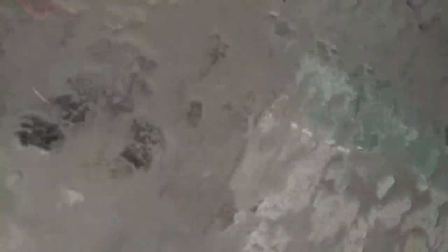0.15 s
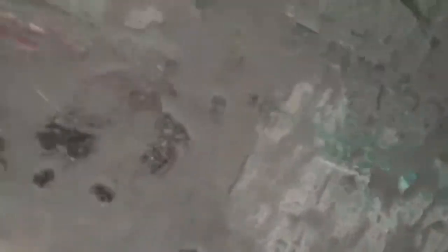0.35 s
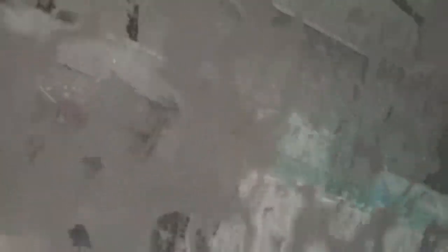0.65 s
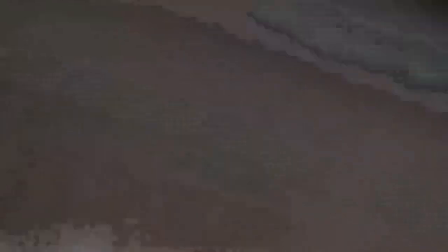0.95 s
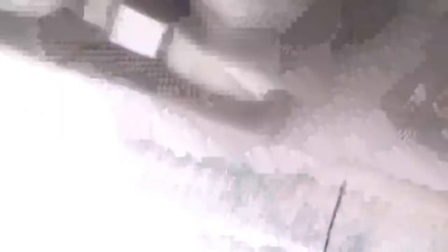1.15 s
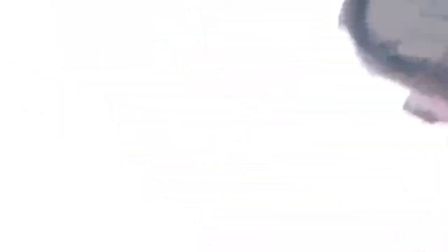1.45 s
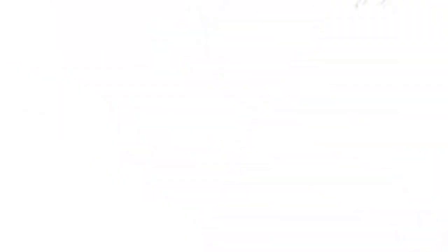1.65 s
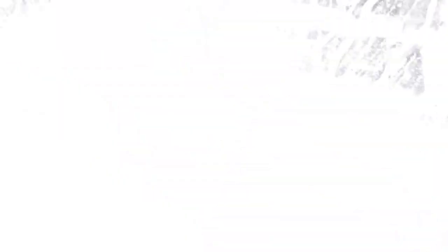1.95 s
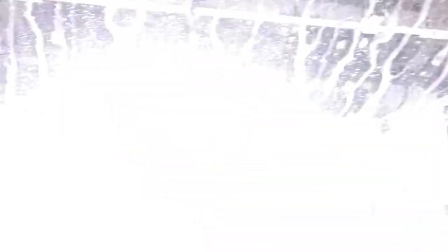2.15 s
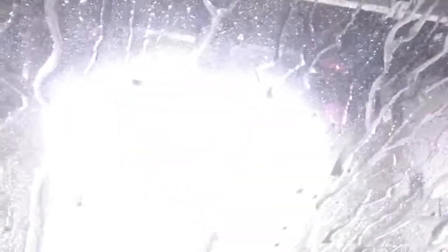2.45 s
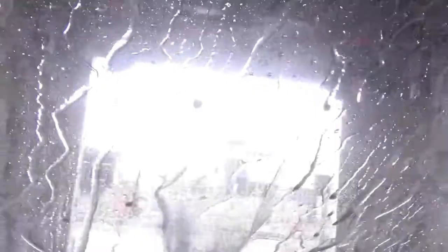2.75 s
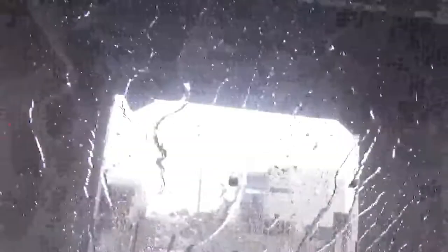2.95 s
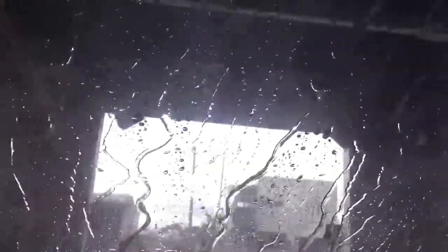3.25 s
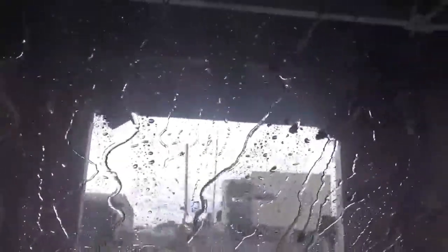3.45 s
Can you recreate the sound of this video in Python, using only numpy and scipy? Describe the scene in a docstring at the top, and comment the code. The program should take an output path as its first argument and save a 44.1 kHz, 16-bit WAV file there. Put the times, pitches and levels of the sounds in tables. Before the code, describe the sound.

Inside a closed car in a wash bay, a water jet hammers the roof close overhead, moves over the glass and dies away; a few drips tick over faint engine throb and machinery hum.

```python
"""Inside a car wash

Stereo at the front seat of an idling car, cabin closed: a jet drums on the roof close overhead, moves on
over the glass and dies away. A heavy drop knocks on the roof, then drips tick and splashes spatter on the
windscreen, with one lighter knock among them. The engine throbs below; machinery hums through the cabin.
Water is random impacts, coloured and rung by resonances; drops are sharp pushes with a brief noise ring.
The engine and the hum are sines, the rush of the bay is coloured noise."""
import sys
import numpy as np
from scipy.fft import rfft, irfft, next_fast_len
from scipy.io import wavfile
from scipy.ndimage import map_coordinates

SR = 44100
rng = np.random.default_rng(int(sys.argv[2]) if len(sys.argv) > 2 else 0)


def output_pcm(signal):
    """Save a mono or channel-first signal as 16-bit PCM at the path in sys.argv[1].

    Samples are clipped to [-1, 1] before scaling.
    """
    pcm = np.clip(np.atleast_2d(signal).T, -1, 1) * 32767
    wavfile.write(sys.argv[1], SR, np.round(pcm).astype(np.int16))


N = 158760
T = np.arange(N) / SR  # seconds
TOP_HZ = 11150  # band limit

# In every colour table the levels are relative; a spread is the standard deviation of a bell-shaped swell.

# Left-right likeness in the cabin. Each row: frequency in Hz, correlation of the two channels.
LIKENESS = [(100, 1), (300, 0.95), (600, 0.66), (2000, 0.58), (5000, 0.56), (9000, 0.8)]

# Throb of the idling engine. Each entry: level in dB of the next multiple of the firing rate.
ENGINE_DB = [-40.5, -59, -60]
FIRING_HZ = 23.16

# Hum of the wash machinery. Each row: frequency in Hz, mean level in dB.
HUM = [(122, -50), (140, -46), (173, -51)]
HUM_WAVER_DB, HUM_DRIFT_HZ = 0.5, 2.94
BOOM_S, BOOM_SPREAD_S, BOOM_HZ, BOOM_DB = 2.83, 0.033, 174.7, -37  # the hum swells once

# Colour of the wash bay through the cabin. Each row: frequency in Hz, level in dB per Hz.
BAY_COLOUR = [(25, -5.5), (60, -6), (90, -10.5), (120, -0.5), (175, -2.5), (215, -10.5), (320, -12),
              (450, -17), (600, -21), (740, -13.5), (1000, -17.5), (1700, -25.5), (3200, -23.5),
              (5000, -30.5), (7500, -35.5), (11000, -37)]
BAY_DB = -39.5

# Spray on the car, before the trims below. Each row: time in seconds, roof drumming in dB,
# glass patter in dB, mist hiss in dB, left over right in dB.
SPRAY = [(0, -34, -29, -35, 1.5), (.23, -32.5, -34, -36.5, 5), (.44, -42.5, -29.5, -40.5, 4),
         (.54, -34.5, -34.5, -42.5, 3.5), (.77, -35.5, -35.5, -44, 4.5), (1.029, -33.5, -34, -41.5, 3.5),
         (1.138, -35.5, -34.5, -43.5, 4.5), (1.5, -35.5, -33.5, -43, 4), (1.7, -34.5, -34.5, -44, 4.5),
         (1.88, -36.5, -37.5, -45.5, 2.5), (2.03, -39.5, -37.5, -48.5, 1.5), (2.21, -42, -40, -54.5, 1.5),
         (2.43, -41.5, -48.5, -73, 2), (2.9, -43, -50.5, -65, 11)]
ROOF_TRIM_DB, GLASS_TRIM_DB, MIST_TRIM_DB = 2.5, 1, 2
ROOF_RATE, GLASS_RATE, MIST_RATE = 5000, 5000, 9000  # droplets a second at full flow
DRAIN_START_S, DRAIN_DB_PER_S = 2.096, 16.5  # the jet has passed; the last of it thins out

# Colours of roof drumming, glass patter and mist. Each row: frequency in Hz, level in dB per Hz.
ROOF_COLOUR = [(80, -19.5), (115, 1.5), (160, -0.5), (220, 3.5), (370, 3.5), (520, 2.5), (780, 1.5),
               (1100, -0.5), (1500, -4.5), (2200, -18), (4000, -47.5)]
GLASS_COLOUR = [(600, -15.5), (1300, -4), (2000, 0.5), (2400, 0), (2750, -2), (3300, -1.5), (3900, -3.5),
                (4800, -7.5), (5800, -17.5), (8000, -43)]
MIST_COLOUR = [(3000, -5.5), (5000, 2), (6300, 2), (7500, 0), (9000, 1), (11000, -6.5)]

# Panel resonances rung by spray and jet. Each row: centre in Hz, width in Hz, dB against the bare impact.
PANEL = [(743, 22, -2.5), (817, 11, -7), (1012, 31, -10), (1400, 8.7, -18.5), (1640, 6.6, 0),
         (1875, 9.8, -3), (2020, 84, -7), (2795, 38, -1), (3500, 28, -19), (3770, 47, -29)]

# The jet square on the roof. Each row: time in seconds, level in dB.
JET_LEVEL = [(0, -23), (.08, -21), (.17, -19.8), (.3, -21.5), (.41, -23.5), (.47, -27), (.54, -34.5),
             (.62, -69)]
JET_RATE, JET_PAN_DB = 14000, 3.5  # droplets a second; left over right
JET_WAVER_DB = 1  # each resonance comes and goes as the jet moves

# Colour of the jet on the roof. Each row: frequency in Hz, level in dB.
JET_COLOUR = [(100, -31), (160, -12.5), (215, 0), (400, -2.5), (750, 0.5), (1300, -2), (2000, -4.5),
              (2800, -7), (4000, -10), (5200, -18), (7000, -50), (11000, -28)]

# Metal under the jet. Each row: centre in Hz, width in Hz, mean dB against the bare impact.
JET_RINGS = [(1170, 62, -4), (1447, 31, 0.5), (1570, 43, -15), (2040, 64, -4.5), (2670, 130, -4),
             (3830, 190, -3)]

# Roof booms as the jet comes square onto it. Each row: middle in seconds, spread in seconds,
# level in dB, centre in Hz, width in Hz.
JET_BOOMS = [(0.092, 0.024, -33, 402.3, 200), (0.163, 0.056, -31, 802, 500), (0.265, 0.061, -32, 946, 400),
             (0.274, 0.052, -30, 1750, 450), (.37, 0.062, -32, 1406, 300)]

# Glass ringing under the travelling spray. Each row: time in seconds, pitch in Hz, level in dB.
SWEEP = [(0, 2686, -48), (.4, 2700, -38), (.52, 2677, -38), (.66, 2760, -47), (.8, 2750, -46),
         (0.889, 2744, -41), (.96, 2856, -39.5), (1.02, 3110, -39), (1.11, 2945, -52), (1.25, 2450, -40.5),
         (1.42, 2290, -53), (1.7, 2250, -54), (2.15, 3007, -45), (2.3, 3100, -50), (2.45, 3200, -64),
         (2.6, 3220, -85)]
SWEEP_WIDTH_HZ, SWEEP_PAN_DB = 530, 4.5

# Gouts of water thudding on the roof. Each row: middle in seconds, spread in seconds, level in dB, centre in Hz.
GOUTS = [(0.551, 0.0078, -31, 234), (0.77, 0.017, -39, 226), (1.2, 0.013, -32.5, 550),
         (1.245, 0.062, -37, 383), (1.355, 0.033, -37, 367), (1.525, 0.032, -40, 372),
         (1.697, 0.015, -34, 287), (1.875, 0.017, -33.5, 342), (1.86, 0.018, -36, 743)]
GOUT_WIDTH = 0.36  # fraction of the centre frequency

# Push of a drop and its early reflections in the cabin. Each row: delay in seconds, level in dB.
ECHOES = [(0, 1), (.0003, -5), (.0016, -7), (.0038, -9)]

# Heavy drops on the roof. Each row: time in seconds, level in dB (the slap is trimmed below),
# treble tilt of the slap in dB per octave.
KNOCKS = [(.9703, -9.3, 0), (2.6555, -23.5, 2.5)]
KNOCK_T60_S, KNOCK_TRIM_DB, KNOCK_SNAP = .022, -2.5, 5  # snap: push height against the ring's start
KNOCK_PIVOT_HZ, KNOCK_PAN_DB = 1500, 4

# Colour of that slap. Each row: frequency in Hz, level in dB.
KNOCK_COLOUR = [(150, -20), (450, -7), (800, 0), (1300, -2), (1900, -11), (2400, -8), (3200, -13),
                (3800, -25), (5200, -26), (6500, -34), (11000, -41)]

# Low modes of the roof. Each row: frequency in Hz, level in dB below the drop, fall by 60 dB in seconds.
ROOF_MODES = [(650, -14, .018), (845, -10, .024)]

# Drips on the glass, before the trim below. Each row: time in seconds, level in dB,
# treble tilt in dB per octave.
DRIPS = [(1.362, -22.5, 1), (1.5275, -17.5, .5), (2.4448, -27, 0), (2.4835, -36.5, 0), (2.5466, -21.5, .5),
         (2.7018, -39, -1), (2.7302, -23, -2.5), (2.770, -24.5, -2.5), (2.8168, -33.5, -1),
         (3.490, -13.5, -2)]
DRIP_T60_S, DRIP_TRIM_DB, DRIP_SNAP, DRIP_PIVOT_HZ = .014, -6.3, 5.5, 4500

# Colour of a drip. Each row: frequency in Hz, level in dB.
DRIP_COLOUR = [(300, -25), (1500, -17), (2600, -9), (3150, -10), (3650, 0), (4400, -3), (5600, -6),
               (6700, -12), (9000, -15), (11000, -12)]

# Splashes on the glass. Each row: middle in seconds, spread in seconds, body in dB, fizz in dB,
# ring in dB, ring pitch in Hz.
SPLASHES = [(2.669, .002, -36.5, -46, -41, 4300), (2.675, .003, -41, -47, -47, 3300),
            (3.033, .016, -47.5, -47.5, -46.5, 3900), (3.143, .018, -46.5, -51, -48, 3600),
            (3.202, .005, -43.5, -45.5, -45, 3450), (3.227, .012, -40, -43, -43, 3500),
            (3.379, .0039, -40, -33, -42, 2600), (3.484, .008, -47, -46, -50, 2600)]
SPLASH_RATE, SPLASH_RING_WIDTH_HZ = 2700, 850  # droplets a second
SPLASH_GRIT_DB = 1.5  # the droplets arrive in clumps

# Colours of splash body and fizz. Each row: frequency in Hz, level in dB.
BODY_COLOUR = [(400, -11), (1000, -8.5), (1600, 5), (2500, -5), (3600, 2), (5500, 3), (8000, -23)]
FIZZ_COLOUR = [(3000, -10), (5000, -10), (7000, 1), (9000, -1.5), (10800, -2.5)]

# Windscreen resonances. Each row: centre in Hz, width in Hz, dB against the bare impact.
WINDSCREEN = [(2650, 200, -4), (3330, 120, -5), (3650, 170, -17), (5030, 430, -8)]


def amp(db):
    """Decibels to gain."""
    return 10 ** (np.asarray(db) / 20)


def unit(x):
    """Scaled to rms 1."""
    return x / np.sqrt(np.mean(x ** 2) + 1e-20)


def along(points, hz):
    """(Hz, value) points read on a log frequency axis."""
    f, v = np.transpose(points)
    return np.interp(np.log(hz + 1), np.log(f + 1), v)


def wobble(rate):
    """A smooth random curve, rate knots a second."""
    knots = rng.standard_normal(int(N * rate / SR) + 4)
    return map_coordinates(knots, [T * rate])


def swell(s, spread):
    """A smooth bell-shaped rise and fall around a moment."""
    return np.exp(-.5 * ((T - s) / spread) ** 2)


def decay(t, t60):
    """Exponential decay, down 60 dB after t60 seconds."""
    return np.exp(-np.log(1000) * t / t60)


def filtered(x, response):
    """x times a complex response of frequency."""
    m = 2 * next_fast_len(N)
    spectrum = rfft(x, m) * response(np.fft.rfftfreq(m, 1 / SR))
    return irfft(spectrum, m)[..., :N]


def coloured(x, colour):
    """x through a causal minimum-phase filter of unit energy with the given colour."""
    def response(hz):
        gain = amp(along(colour, hz)) * np.where(hz < TOP_HZ, 1, .5)
        cepstrum = irfft(np.log(unit(gain)))
        half = len(cepstrum) // 2
        # folding the cepstrum forward in time makes the filter causal
        return np.exp(rfft(np.r_[cepstrum[0], 2 * cepstrum[1:half], np.zeros(half)]))
    return filtered(x, response)


def stereo(pair):
    """Two unrelated signals blended into left and right, near mono in the bass."""
    def blend(hz):
        turn = np.arccos(np.clip(along(LIKENESS, hz), -1, 1)) / 2
        return np.array([np.cos(turn), np.sin(turn)])
    mid, side = filtered(pair, blend)
    return np.array([mid + side, mid - side])


def panned(db):
    """Left and right gains for a level difference."""
    return amp(np.array([[.5], [-.5]]) * db)


def droplets(rate, scatter_db):
    """Two streams of random impacts of uneven size and either sign."""
    hit = rng.random((2, N)) < rate / SR
    size = amp(scatter_db * np.clip(rng.standard_normal((2, N)), -2, 2))
    sign = np.sign(rng.standard_normal((2, N)))
    return unit(hit * size * sign / np.sqrt(rate))


def panel(x, modes):
    """Sheet metal and glass favour a few resonances, added to the bare impact."""
    def response(hz):
        return 1 + sum(amp(db) * 1j * hz * width / (centre ** 2 - hz ** 2 + 1j * hz * width)
                       for centre, width, db in modes)
    return filtered(x, response)


def ringing(centre_hz, width_hz):
    """Droplets exciting one resonance, whose pitch may move; stereo, rms 1."""
    def low(x):
        return filtered(x, lambda hz: 1 / (1 + 2j * hz / width_hz) ** 2)
    in_phase = low(droplets(GLASS_RATE, scatter_db=4.5))
    quadrature = low(droplets(GLASS_RATE, scatter_db=1.5))
    # slow noise carried up to the resonance
    turning = np.exp(2j * np.pi * np.cumsum(centre_hz * np.ones(N)) / SR)
    return unit(stereo(((in_phase + 1j * quadrature) * turning).real))


def engine():
    """The low, even throb of the idling engine: sines at multiples of a barely wavering firing rate."""
    phase = 2 * np.pi * np.cumsum(FIRING_HZ * (1 + .003 * wobble(2.9))) / SR
    return np.sqrt(2) * sum(amp(db) * np.sin(order * phase) for order, db in enumerate(ENGINE_DB, 1))


def machinery():
    """Sines wavering in level and pitch hum over the muffled noise of the bay."""
    hum = amp(BOOM_DB) * swell(BOOM_S, BOOM_SPREAD_S) * np.sin(2 * np.pi * BOOM_HZ * T)
    for hz, db in HUM:
        level = amp(db + HUM_WAVER_DB * wobble(6.6))
        phase = 2 * np.pi * np.cumsum(hz + HUM_DRIFT_HZ * wobble(9)) / SR
        hum = hum + level * np.sin(phase)
    bay = unit(stereo(coloured(rng.standard_normal((2, N)), BAY_COLOUR)))
    return np.sqrt(2) * hum + amp(BAY_DB) * bay


def spray():
    """Dense droplets on roof and glass under a fine mist; a weaker jet brings fewer of them."""
    s, *columns = np.transpose(SPRAY)
    roof_db, glass_db, mist_db, pan_db = [np.interp(T, s, column) for column in columns]
    drain_db = -DRAIN_DB_PER_S * np.maximum(T - DRAIN_START_S, 0)
    flow = amp(glass_db - glass_db.max())

    def layer(colour, rate, scatter_db, flutter_db):
        hits = panel(droplets(rate * np.sqrt(flow), scatter_db), PANEL)
        return unit(stereo(coloured(hits, colour))) * amp(drain_db + flutter_db * wobble(30.26))

    roof = amp(roof_db + ROOF_TRIM_DB) * layer(ROOF_COLOUR, ROOF_RATE, scatter_db=5, flutter_db=.4)
    glass = amp(glass_db + GLASS_TRIM_DB) * layer(GLASS_COLOUR, GLASS_RATE, scatter_db=1, flutter_db=.5)
    mist = amp(mist_db + MIST_TRIM_DB) * layer(MIST_COLOUR, MIST_RATE, scatter_db=1.5, flutter_db=.84)
    return (roof + glass) * panned(pan_db) + mist * panned(.3)


def jet():
    """The full jet hammers the roof, swells and booms as it comes square onto it, then swings away."""
    impact = panel(droplets(JET_RATE, scatter_db=1.5), PANEL)
    hits = impact
    for mode in JET_RINGS:
        ring_alone = panel(impact, [mode]) - impact
        hits = hits + ring_alone * amp(JET_WAVER_DB * wobble(11.7))
    level_db = np.interp(T, *np.transpose(JET_LEVEL)) + 0.57 * wobble(89.4)
    hammer = amp(level_db) * unit(stereo(coloured(hits, JET_COLOUR)))
    booms = sum(amp(db) * swell(s, spread) * ringing(hz, width) for s, spread, db, hz, width in JET_BOOMS)
    return (hammer + booms) * panned(JET_PAN_DB)


def sweep():
    """The travelling spray rings one patch of glass after another, so the resonance glides."""
    s, hz, db = np.transpose(SWEEP)
    ring = ringing(np.interp(T, s, hz), SWEEP_WIDTH_HZ)
    return amp(np.interp(T, s, db)) * ring * panned(SWEEP_PAN_DB)


def gouts():
    """Thicker clumps of water make the roof rumble briefly: swells of narrow-band noise."""
    out = np.zeros(N)
    for s, spread, db, centre in GOUTS:
        band = lambda hz: 1 / (1 + ((hz - centre) / (GOUT_WIDTH * centre / 2)) ** 2)
        rumble = unit(filtered(rng.standard_normal(N), band))
        out += amp(db) * swell(s, spread) * rumble
    return out * panned(1.3)


def impacts(rows, colour, t60, snap, pivot_hz):
    """Each drop is a sharp push, its early reflections and a brief diffuse ring, with its own treble tilt."""
    out = np.zeros((2, N + SR))
    t = np.arange(SR // 10) / SR
    lead = len(t) // 2  # room ahead of the push for the tilt filter
    octaves = np.clip(np.log2((np.fft.rfftfreq(len(t), 1 / SR) + 1) / pivot_hz), -2, 2)
    for s, db, tilt_db in rows:
        ring = rng.standard_normal((2, len(t))) * decay(t, t60)
        for delay, echo_db in ECHOES:
            ring[0, round(delay * SR)] += snap * amp(echo_db)
        tilted = irfft(rfft(np.roll(ring, lead, axis=1)) * amp(tilt_db * octaves), len(t))
        start = round(s * SR) - lead
        out[:, start:start + len(t)] += amp(db) * tilted
    return stereo(coloured(out[:, :N], colour))


def thuds():
    """A heavy drop also sets the roof's low modes swinging for a moment, as decaying sines."""
    out = np.zeros(N)
    for s, db, _ in KNOCKS:
        t = np.maximum(T - s, 0)
        for hz, level_db, t60 in ROOF_MODES:
            out += amp(db + level_db) * decay(t, t60) * np.sin(2 * np.pi * hz * t)
    return out


def knocks():
    """Dull knocks of heavy drops: a slap on the roof and the thud of its low modes."""
    slap = impacts(KNOCKS, KNOCK_COLOUR, KNOCK_T60_S, KNOCK_SNAP, KNOCK_PIVOT_HZ)
    return (amp(KNOCK_TRIM_DB) * slap + thuds()) * panned(KNOCK_PAN_DB)


def drips():
    """Bright ticks of single drips on the windscreen, each a push with a very short ring."""
    return amp(DRIP_TRIM_DB) * impacts(DRIPS, DRIP_COLOUR, DRIP_T60_S, DRIP_SNAP, DRIP_PIVOT_HZ)


def splashes():
    """Falling water breaks up into short, gritty showers; each rings its own spot of the glass."""
    body, fizz = np.zeros((2, N))
    rings = np.zeros((2, N))
    for s, spread, body_db, fizz_db, ring_db, ring_hz in SPLASHES:
        shape = swell(s, spread)
        body += amp(body_db) * shape
        fizz += amp(fizz_db) * shape
        rings += amp(ring_db) * shape * ringing(ring_hz, SPLASH_RING_WIDTH_HZ)

    def shower(colour):
        hits = panel(droplets(SPLASH_RATE, scatter_db=.5), WINDSCREEN)
        return unit(stereo(coloured(hits, colour)))

    grit = unit(amp(SPLASH_GRIT_DB * wobble(350)))
    return (body * shower(BODY_COLOUR) + fizz * shower(FIZZ_COLOUR) + rings) * grit


def scene():
    """Everything as heard from the front seat."""
    water = spray() + jet() + sweep() + gouts() + knocks() + drips() + splashes()
    return engine() + machinery() + water


def record(dry):
    """The microphone signal fades out over 200 Hz around the band limit; nothing is kept above."""
    return filtered(dry, lambda hz: np.clip((TOP_HZ - hz) / 200 + .5, 0, 1))


dry = scene()
out = record(dry)
output_pcm(out)
```